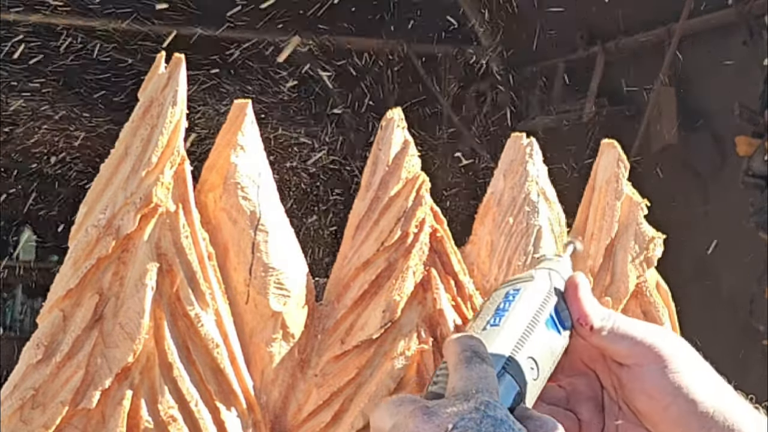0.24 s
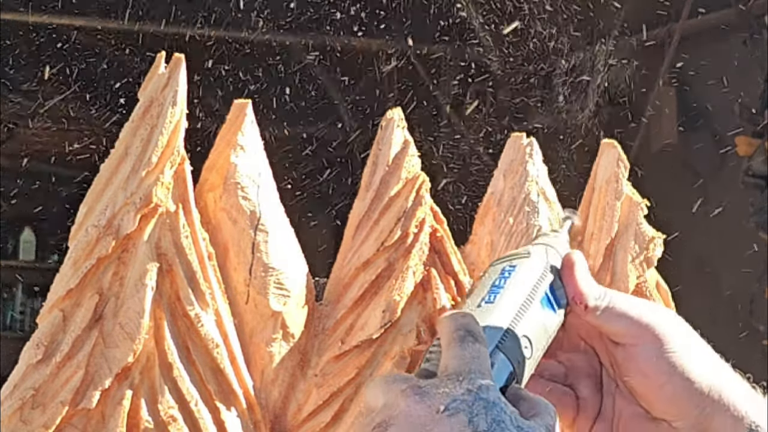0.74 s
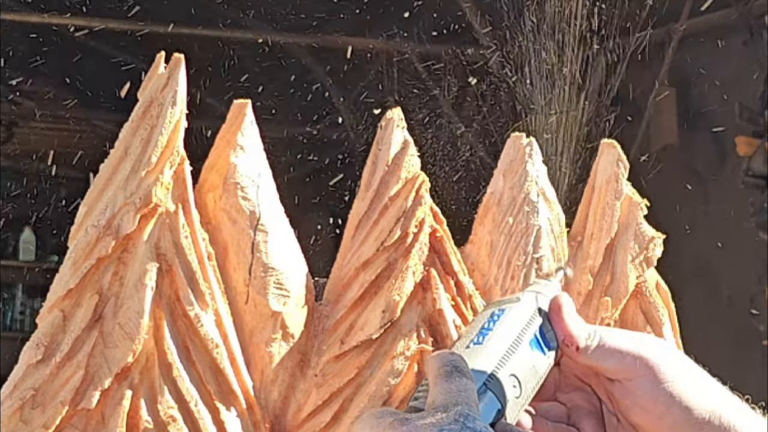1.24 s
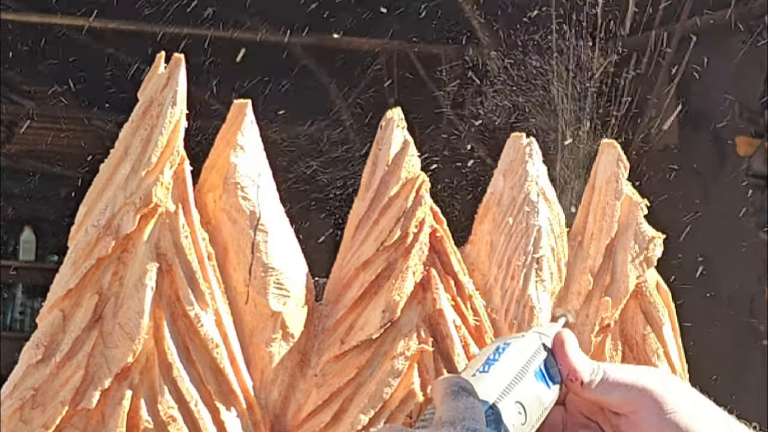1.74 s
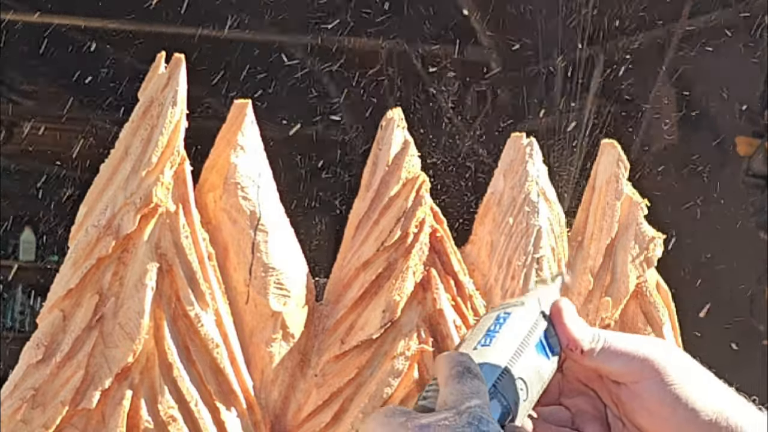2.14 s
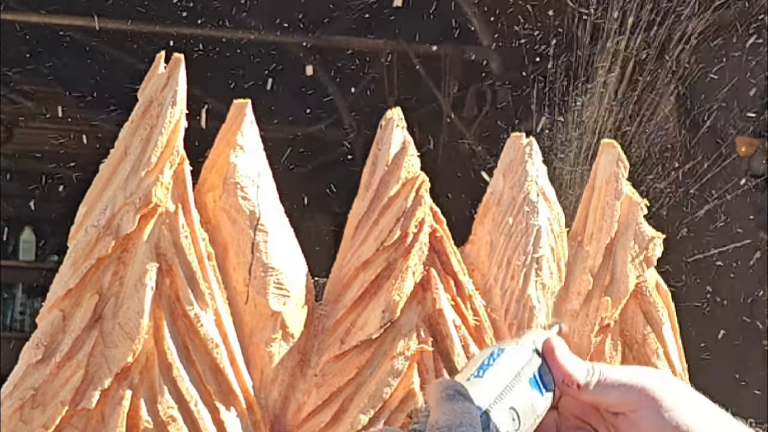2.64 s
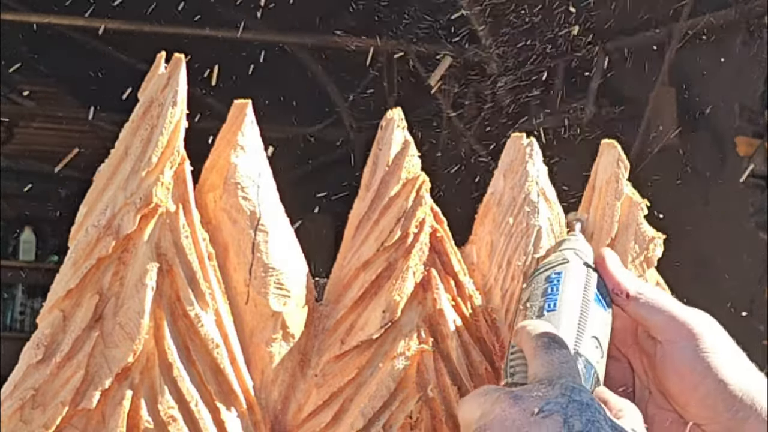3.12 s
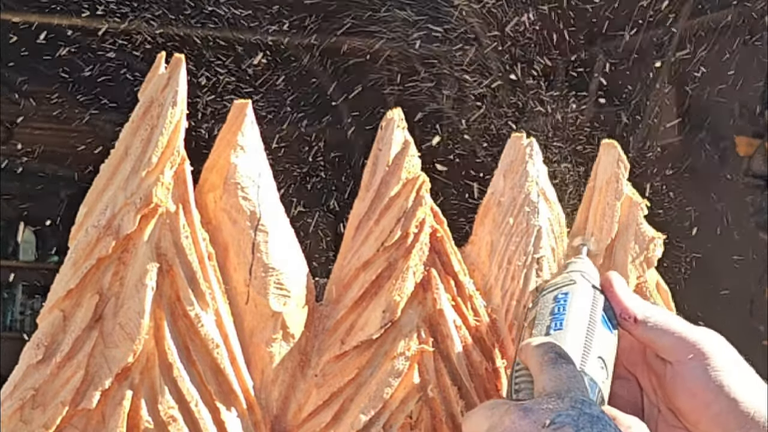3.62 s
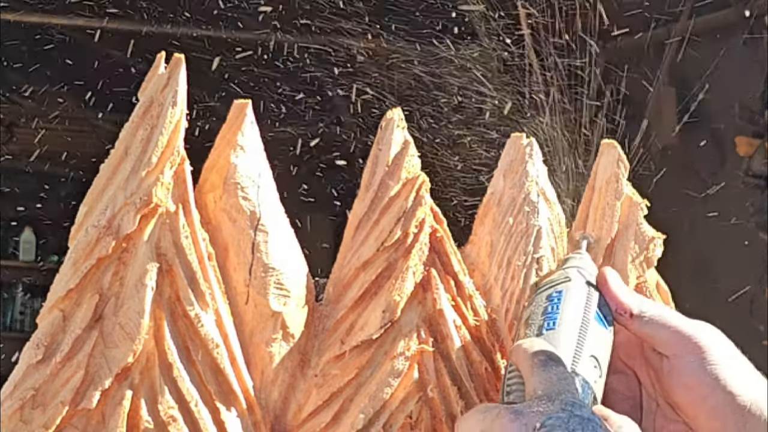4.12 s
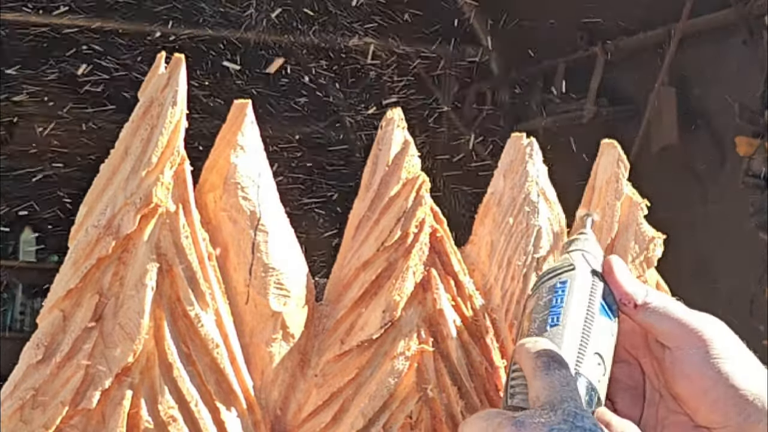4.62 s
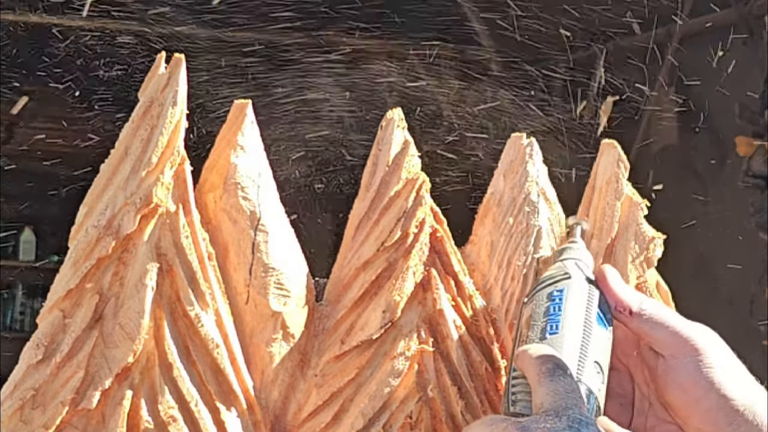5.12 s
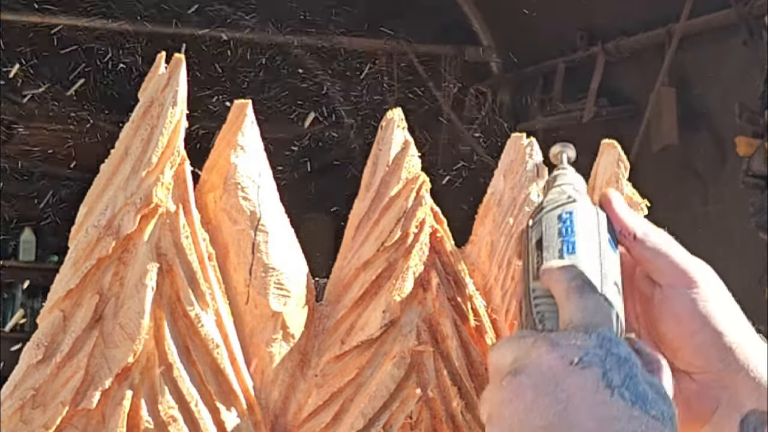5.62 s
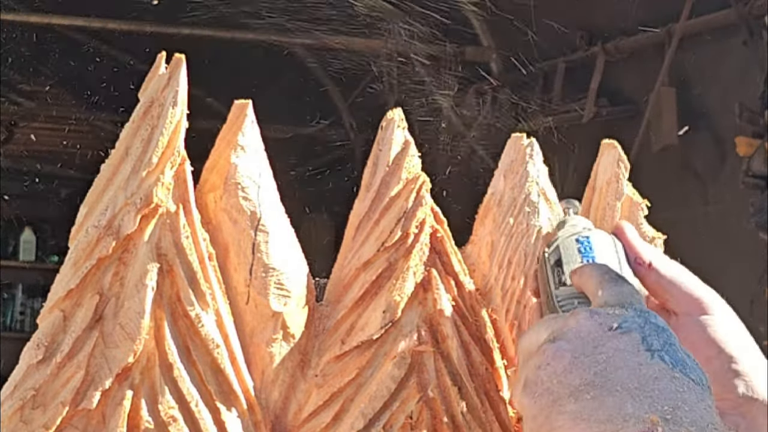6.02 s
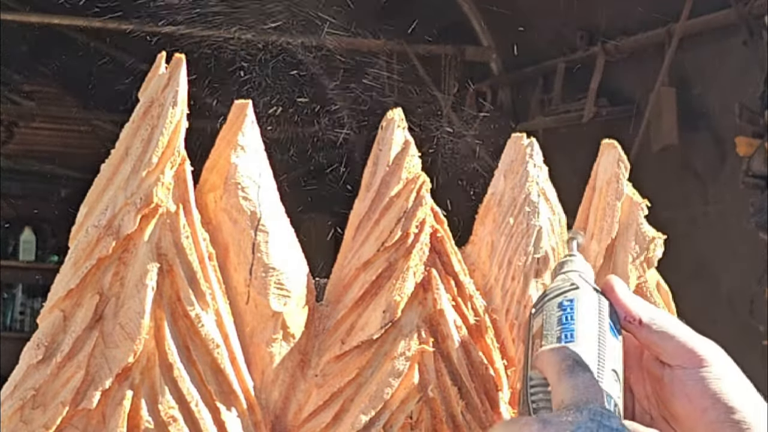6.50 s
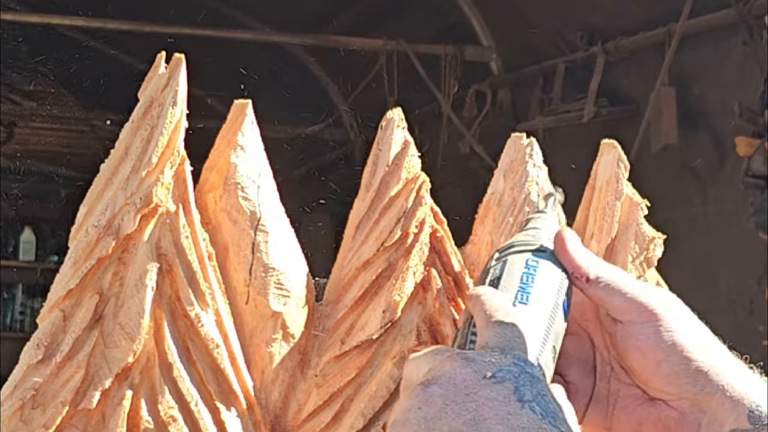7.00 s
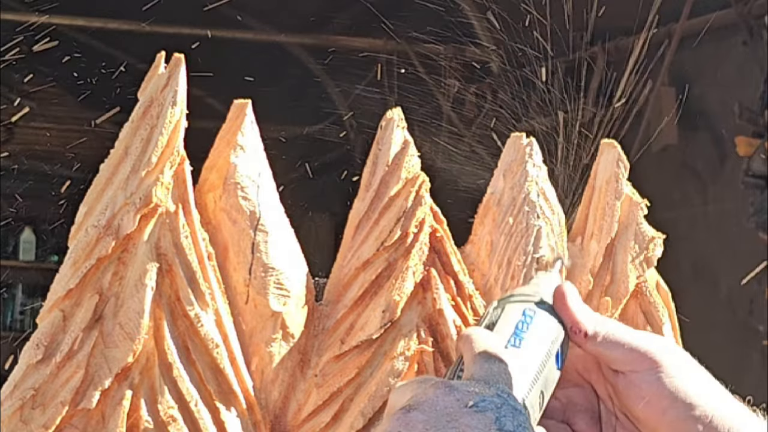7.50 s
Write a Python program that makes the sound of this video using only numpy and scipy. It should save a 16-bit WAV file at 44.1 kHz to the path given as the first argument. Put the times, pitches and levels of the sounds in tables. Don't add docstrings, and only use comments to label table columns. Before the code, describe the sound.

Close up in an open workshop, a small electric rotary tool runs continuously, slightly left of centre: a buzzy whine near 400 Hz with bright overtones and a steady fan hiss, above low wind rumble and a faint far drone. A bite is just ending at 0 s. Firm cuts follow at about 0.45, 0.9, 1.3, 1.8, 2.3 and 2.7 s, each roughly a tenth of a second: a loud ringing rasp, gritty chip hiss, pitch sagging then swinging back. From 3.3 to 5.4 s come shorter, lighter, irregular grazes, often in quick pairs, some with thin squeals. Strokes then thin out, with touches near 6.0 and 6.4 s and wobbling free whine between. A hard, noisy bite lands at 7.15-7.3 s, dragging the pitch down, with a momentary dip in level after; another hits at 7.6 s and ends the scene as the wind swells.

```python
import sys
import numpy as np
from scipy import signal
from scipy.fft import rfft, irfft, next_fast_len
from scipy.io import wavfile
from scipy.ndimage import uniform_filter1d

SR = 44100
rng = np.random.default_rng(int(sys.argv[2]) if len(sys.argv) > 2 else 0)


def rack_gain(trim_db):
    fader = np.asarray(trim_db, float)
    return 10 ** (fader / 20)


def pcm_store(signal):
    levels = np.round(np.clip(np.atleast_2d(signal), -1, 1) * 32767)
    wavfile.write(sys.argv[1], SR, levels.astype(np.int16).T)


N = 341775
STEP = 32
MAINS_HZ = 120

# (time [s], length [s], drag [Hz lost per s], tooth force [dB], chip hiss [dB])
BITES = [(-0.15, 0.19, 225.0, -13.5, -34), (0.441, 0.14, 373.0, 1, -23), (0.922, 0.12, 469.0, 0.5, -21),
         (1.308, 0.15, 417.0, 0.5, -21.5), (1.762, 0.101, 445.0, -1.5, -18.5),
         (2.269, 0.11, 432.0, -1.5, -22), (2.708, 0.091, 587.0, 0.5, -20.5),
         (3.286, 0.062, 285.0, -7.5, -20), (3.396, 0.05, 183.0, -14, -21),
         (3.587, 0.055, 248.0, -3.5, -16.5), (3.75, 0.063, 140.0, -13, -24),
         (3.849, 0.061, 216.0, -6.5, -21.5), (4.149, 0.1, 204.0, -8, -17.5), (4.363, 0.053, 1, -22, -28),
         (4.502, 0.044, 164.0, -11.5, -24), (4.895, 0.083, 304.5, -4, -21.5),
         (5.049, 0.097, 105.0, -12.0, -22.5), (5.337, 0.064, 300.0, -3.5, -16),
         (5.986, 0.13, 124.5, -4, -20.5), (6.413, 0.099, 308.5, -2.5, -22.5),
         (7.147, 0.057, 270.5, -1.5, -25), (7.217, 0.098, 696.5, 0.5, -14.5),
         (7.582, 0.063, 300.0, -4, -34), (7.649, 0.058, 1021, 2.0, -15)]


def unit(x):
    return x / np.sqrt(np.mean(x ** 2) + 1e-20)


def along(points, hz):
    f, v = np.transpose(points)
    return np.interp(np.log(hz + 1), np.log(f + 1), v)


def curves(rows):
    s, *cols = np.transpose(rows)
    return [np.interp(np.arange(N) / SR, s, c) for c in cols]


def wobble(rate, step=1):
    knots = rng.standard_normal(1000)
    return np.interp(np.arange(0, N, step) * rate / SR, np.arange(len(knots)), knots)


def power_sum(*dbs):
    return 10 * np.log10(sum(rack_gain(db) ** 2 for db in dbs))


def filtered(x, response):
    m = next_fast_len(N + SR // 4)
    return irfft(rfft(x, m) * response(np.fft.rfftfreq(m, 1 / SR)), m)[..., :N]


def rush(spectrum, patchy_db):
    # (frequency [Hz], likeness [0 to 1])
    alike = [(40, .985), (90, .975), (180, .89), (600, .9), (1400, .75), (3000, .62), (7000, .5),
             (15000, .52)]
    z = signal.stft(rng.standard_normal((2, N)), nperseg=512)[2]
    field = uniform_filter1d(rng.standard_normal(z.shape[1:]), 6, 0)
    field = uniform_filter1d(field, 8, 1)
    pair = signal.istft(z * rack_gain(patchy_db * unit(field)), nperseg=512)[1][:, :N]

    def middle_and_side(hz):
        turn = np.arccos(np.clip(along(alike, hz), -1, 1)) / 2
        return rack_gain(along(spectrum, hz)) * [np.cos(turn), np.sin(turn)]

    mid, side = filtered(pair, middle_and_side)
    return unit(np.array([mid + side, mid - side]))


def tone(angle, db, flutter_db, spread):
    chatter_db = flutter_db * (1 + 0.07 * np.clip(db + 34, 0, 20)) * wobble(48, STEP)
    apart = spread * wobble(12, STEP)
    phase = rng.uniform(0, 2 * np.pi) + np.array([apart, -apart])
    slow = np.sqrt(2) * rack_gain(db + chatter_db) * np.exp(1j * phase)
    ramp = np.diff(slow, append=slow[:, -1:])[..., None] * np.arange(STEP) / STEP
    smooth = (slow[..., None] + ramp).reshape(2, -1)[:, :N]
    return (smooth * np.exp(1j * angle)).imag


def rumble():
    # (frequency [Hz], level [dB per Hz])
    wind_shape = [(15, -30), (28, -4.5), (45, -1), (90, -2.5), (125, -15.5), (170, -24.5), (300, -37.5),
                  (600, -80)]
    # (frequency [Hz], level [dB per Hz])
    drone_shape = [(100, -33), (150, -7.5), (290, -10), (500, -25.5)]
    # (time [s], rumble [dB], drone [dB])
    gusts = [
        (0, -30.5, -38.5),
        (1.7, -37, -44.5),
        (1.95, -33, -46),
        (2.1, -33.5, -49),
        (5.2, -33.5, -58.5),
        (6.9, -32.5, -48),
        (7.75, -31.5, -42),
    ]
    rumble_db, drone_db = curves(gusts)
    wind = rack_gain(rumble_db + 0.91 * wobble(7.6)) * rush(wind_shape, patchy_db=-0.5)
    return wind + rack_gain(drone_db - 1.0) * rush(drone_shape, patchy_db=2.2)


def slow_time():
    return np.arange(-STEP * 700, N, STEP) / SR


def full(slow):
    return np.interp(np.arange(N) / SR, slow_time(), slow)


def contact():
    attack_s, release_s = .008, 0.0363
    s, length = np.transpose(BITES)[:2, :, None]
    t = slow_time()
    gain = np.minimum((t - s) / attack_s, (s + length - t) / release_s + .5)
    return np.clip((t - s) / length, 0, 1), np.clip(gain, 0, 1)


def shaft():
    # (time [s], speed [Hz])
    aim = [(0.0, 382), (0.58, 403.6), (0.71, 399.4), (1.37, 415.2), (2.04, 387.7), (2.17, 406.5),
           (3.07, 403.7), (3.23, 389.6), (3.56, 417.4), (4.14, 393.3), (4.77, 403.2), (5.16, 387.2),
           (5.46, 402.3), (6.15, 396.8), (6.24, 408.6), (6.96, 388.5), (7.43, 412.9), (7.75, 377.6)]
    settle_s, swing_hz, swing_lag = .956, 1.146, .318
    quick, quick_s = .391, .385
    easing = .303
    through, gain = contact()
    drag = np.transpose(BITES)[2] @ (gain * (1 - easing * (through - .5)))
    u = np.arange(2000) * STEP / SR
    swing = np.exp(-u / settle_s) * np.cos(2 * np.pi * swing_hz * u - swing_lag)
    answer = swing + quick * np.exp(-u / quick_s)
    lost = signal.fftconvolve(drag, answer)[:len(drag)] * STEP / SR
    speed = uniform_filter1d(curves(aim)[0] - full(lost), size=900)
    return speed, 2 * np.pi * np.cumsum(speed) / SR


def levels():
    # (time [s], flank towards the listener [dB], rub [dB])
    hand = [(0, -0.5, -1.5), (2.8, -1.5, 1.5), (3.25, 0.5, 0.5), (3.42, 2, 5), (3.7, 4, 2.5), (4.05, 4, 3),
            (4.3, 1, 4), (4.56, 4.5, 4), (4.75, 0, 0.5), (5, 4.5, 1.5), (5.4, 1, 4), (5.55, 3.5, -0.5),
            (6, 4.5, -3.5), (6.35, 3, -3.5), (6.55, 5, 0.5), (7.05, -1.5, -3.5), (7.75, -4, -1.5)]
    # (frequency [Hz], level [dB])
    free_curves = [
        [(300, -30), (345, -49.5), (362, -36.5), (385, -29.5), (415, -31.5)],
        [(600, -33), (700, -34.5), (720, -38.5), (790, -30.5), (830, -38.5)],
        [(900, -36), (1070, -38.5), (1100, -33.5), (1240, -35.5)],
        [(1200, -34), (1400, -35.5), (1540, -27.5), (1650, -37)],
    ]
    # (frequency [Hz], level [dB])
    work_curves = [
        [(300, -40), (335, -51), (365, -31), (390, -41.5), (415, -32)],
        [(600, -32), (725, -34.5), (770, -19.5), (795, -22), (830, -52)],
        [(900, -35), (1080, -32.5), (1140, -28.5), (1185, -17), (1245, -20.5)],
        [(1200, -18), (1285, -25), (1335, -10.5), (1400, -29), (1540, -29.5), (1650, -25)],
    ]
    upper_free_db, upper_bite_db, upper_sag_db = -38.5, -17.5, 6
    labour_db = 0.25
    favour_bite, favour_dip, favour_free = 6.12, 1, 5.7
    chip_rise, chip_fall_db = 0.51, 3.5
    speed = shaft()[0][::STEP]
    flank_db, rub_db = np.array(curves(hand))[:, ::STEP]
    through, gain = contact()
    force_db, chips_db = np.transpose(BITES)[3:, :, None]
    middle = np.sin(np.pi * through) ** 2

    def total_db(db):
        loudest = (gain * rack_gain(db)).max(axis=0)
        return 20 * np.log10(full(loudest)[::STEP] + 1e-6)

    lifts_db = [.1 * flank_db, rub_db, -.3 * flank_db, flank_db]
    leans = [.05, 0.46, -0.88, 0.22]
    low = []
    for k, free, work, lean, lift_db in zip((1, 2, 3, 4), free_curves, work_curves, leans, lifts_db):
        free_db = along(free, k * speed) + lift_db
        work_db = along(work, k * speed) + total_db(force_db) + lean * rub_db
        low.append(power_sum(free_db, work_db))

    free_db = upper_free_db + labour_db * np.clip(400 - speed, 0, 45) + 0.67 * rub_db
    upper = power_sum(free_db, upper_bite_db + total_db(force_db - upper_sag_db * middle))

    shift = (gain * (favour_bite - favour_dip * middle - favour_free)).sum(axis=0)
    favoured = favour_free + full(shift)[::STEP] + 0.75 * wobble(11, STEP)

    before = 1 - through / chip_rise
    after = (through - chip_rise) / (1 - chip_rise)
    shape_db = -chip_fall_db * np.where(through < chip_rise, before, after)
    fan_db = -30.5 + 0.21 * rub_db
    return *low, upper, favoured, power_sum(fan_db, total_db(chips_db + shape_db))


def air():
    # (frequency [Hz], level [dB per Hz])
    fan_shape = [(100, -41), (250, -9), (550, -9), (1000, -2.5), (1600, 1.5), (2100, -0.5), (2620, -3),
                 (3000, -4), (5000, -2.5), (9500, -3), (11800, -8.5), (15500, -11.5)]
    # (frequency [Hz], level [dB per Hz])
    chip_shape = [(200, -38), (500, -26), (1200, -13), (2500, -8), (4300, -4), (7000, -6), (9600, -7),
                  (12200, -13), (15500, -9)]
    # (time [s], treble [dB])
    shade = [
        (0, 0.5),
        (2.8, 2),
        (3.2, -1),
        (4.4, 1),
        (5.8, -1),
        (6.6, 0.5),
        (7.2, 1),
        (7.75, 1.5),
    ]
    hiss_db, angle = np.repeat(levels()[-1], STEP)[:N], shaft()[1]
    idle_db = -29
    fan = rack_gain(np.minimum(hiss_db, idle_db))
    tearing = np.sqrt(rack_gain(hiss_db) ** 2 - fan ** 2)
    beat = np.cos(angle + 0.17 * wobble(40))
    ripple = np.cos(2 * np.pi * MAINS_HZ * np.arange(N) / SR)
    grit = rack_gain(3.8 * wobble(120))
    chips = unit(rush(chip_shape, patchy_db=5.0) * rack_gain(2.7 * beat) * grit)
    pulse_db = 0.87 * beat + .5 * ripple + 1.6 * wobble(25)
    blades = unit(rush(fan_shape, patchy_db=2.0) * rack_gain(pulse_db))
    hiss = rack_gain(2.0) * fan * blades + rack_gain(-1.9) * tearing * chips
    treble = filtered(hiss, lambda hz: 1 / (1 + (10500 / (hz + 1)) ** 16))
    return hiss + (rack_gain(curves(shade)[0]) - 1) * treble


def sidebands():
    # (frequency [Hz], level [dB])
    housing = [(280, -55), (660, -54.5), (920, -51.5), (1300, -48), (1480, -44), (1850, -56), (2110, -44),
               (2350, -73), (2620, -59.5), (2920, -47), (3500, -53), (5600, -51)]
    cage = .393
    speed, angle = shaft()
    speed = speed[::STEP]
    mains = 2 * np.pi * MAINS_HZ * np.arange(N) / SR
    first_db, *_, hiss_db = levels()
    effort_db = 4.0 + 0.1 * (first_db + 24.5) + 0.15 * np.clip(hiss_db + 23, 0, 12)
    out = np.zeros((2, N))
    for k in range(2, 14):
        for sign in (-1, 1):
            mains_db = along(housing, k * speed + sign * MAINS_HZ) + 0.13 * sign
            cage_db = along(housing, (k + sign * cage) * speed) - 6
            out += tone(k * angle + sign * mains, effort_db + mains_db, 4.2, 0.37)
            out += tone((k + sign * cage) * angle, effort_db + cage_db, 0.87, 1.0)
    return out


def squeal():
    # (time [s], length [s], order [multiple of shaft speed], level [dB])
    squeals = [(0, .13, 6, -32), (0.578, .08, 6, -39), (1.069, .1, 6, -41), (1.31, 0.032, 6, -20.5),
               (1.767, .03, 6, -22), (2.363, 0.13, 6, -26.5), (2.812, 0.099, 6, -25), (3.75, .05, 8, -28),
               (4.08, 0.094, 8, -28.5), (5, 0.18, 6, -31), (5.095, 0.1, 9, -30), (5.103, 0.11, 8, -37),
               (5.328, 0.032, 6, -22), (5.351, 0.027, 8, -27), (6, 0.086, 6, -21), (7.396, 0.088, 6, -30),
               (7.577, 0.039, 6, -24), (0.475, .06, 5, -18), (.445, .03, 6, -21.5), (0.921, .04, 6, -18),
               (0.955, 0.059, 5, -21), (1.338, 0.054, 5, -23), (1.78, 0.067, 5, -21), (4.16, 0.064, 2, -27),
               (4.182, .04, 4, -23), (4.924, 0.024, 2, -26), (6.42, .045, 3, -23), (7.152, .035, 3, -18),
               (7.193, 0.054, 5, -21.5), (7.664, 0.041, 4, -20)]
    angle, t = shaft()[1], np.arange(0, N, STEP) / SR
    s, length, order, db = np.transpose(squeals)[:, :, None]
    edge_s = 0.0083
    swell = rack_gain(db) * np.clip(np.minimum(t - s, s + length - t) / edge_s + .5, 0, 1)
    out = np.zeros((2, N))
    for k in (2, 3, 4, 5, 6, 8, 9):
        loudest = swell[np.round(order[:, 0]) == k].max(axis=0)
        out += tone(k * angle, 20 * np.log10(loudest + 1e-6), 1.5, .6)
    return out


def whine():
    # (order [multiple of shaft speed], level under the upper level [dB])
    balance = [(5, -5), (6, -4), (7, -7), (9, -6), (12, -5), (16, -7), (24, -15)]
    # (frequency [Hz], width [Hz], lift [dB])
    resonances = [(2060, 140, 9.5), (2474, 40, 16.5), (2974, 30, 11), (3193, 96, 7.5)]
    speed, angle = shaft()
    first_db, second_db, third_db, fourth_db, upper_db, favoured, _ = levels()
    out = tone(angle, first_db, 1.0, 0.12) + tone(2 * angle, second_db, 2.16, 0.3)
    out += tone(3 * angle, third_db, 1.85, 0.48) + tone(4 * angle, fourth_db, 1.5, 0.25)
    upper_db = upper_db - 0.077 * np.clip(2 - upper_db, 0, 20)
    shake = 0.01 * wobble(110)
    orders = np.arange(5, 25)[:, None]
    contact_db = 11 * np.exp(-((orders - favoured) / 2.43) ** 2)
    ring_db = 0
    for hz, width, db in resonances:
        ring_db = ring_db + db / (1 + (2 * (orders * speed[::STEP] - hz) / width) ** 2)
    share = rack_gain(contact_db + ring_db + along(balance, orders))
    share = share / np.linalg.norm(share[:5], axis=0)
    for k, part in zip(orders, share):
        out += tone(k * (angle + shake), upper_db + 20 * np.log10(part), 2.65, 0.49)
    return out


def lull_db():
    hard_drag, depth_db = 470, .027
    delay_s, width_s = .042, .024
    s, length, drag = np.transpose(BITES)[:3, :, None]
    late = (np.arange(0, N, STEP) / SR - s - length - delay_s) / width_s
    return -depth_db * (np.clip(drag - hard_drag, 0, 250) * np.exp(-late ** 2)).sum(axis=0)


def scene():
    motor = air() + sidebands() + squeal() + whine()
    lull = np.interp(np.arange(N), np.arange(0, N, STEP), lull_db())
    return rumble() + motor * rack_gain(lull)


def low_pass(x):
    return signal.sosfilt(signal.butter(12, 16750, fs=SR, output="sos"), x)


def record(dry):
    # (frequency [Hz], phase [radians])
    lead = [(100, 0), (400, .27), (1030, .42), (2580, .9), (5600, 1.5), (9400, 2.5), (16000, 4.1)]
    # (frequency [Hz], level [dB])
    left = [(60, .3), (170, .8), (390, 3.5), (800, 1.1), (1500, 2), (9000, 2.6), (14000, 1.8)]
    top_hz = 15650
    side = np.array([[.5], [-.5]])

    def response(hz):
        return rack_gain(side * along(left, hz)) * np.exp(1j * side * along(lead, hz)) * (hz < top_hz)

    return low_pass(filtered(dry, response))


dry = scene()
out = record(dry)
pcm_store(out)
```